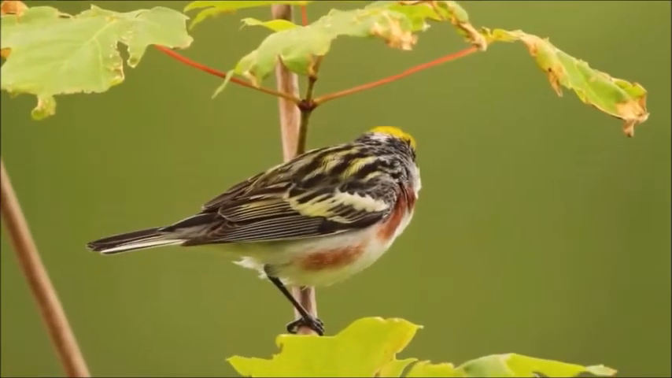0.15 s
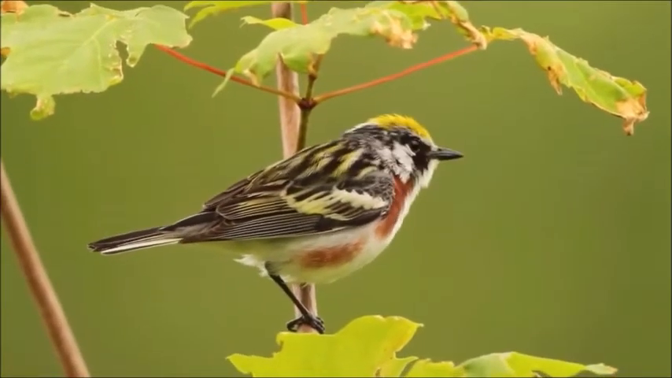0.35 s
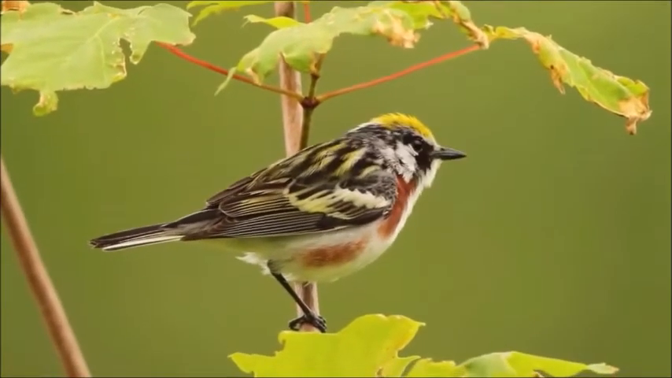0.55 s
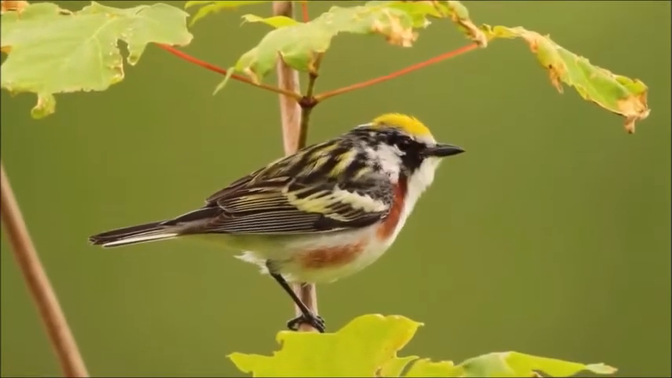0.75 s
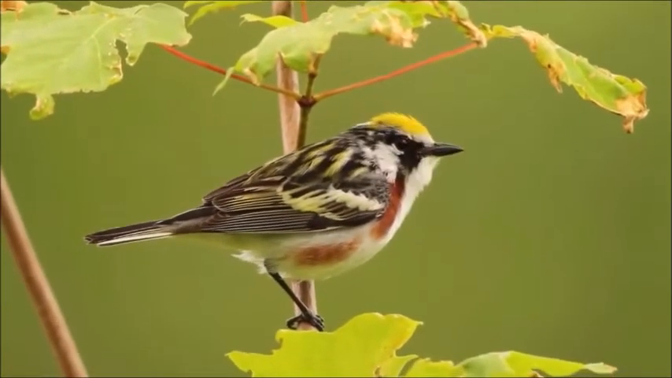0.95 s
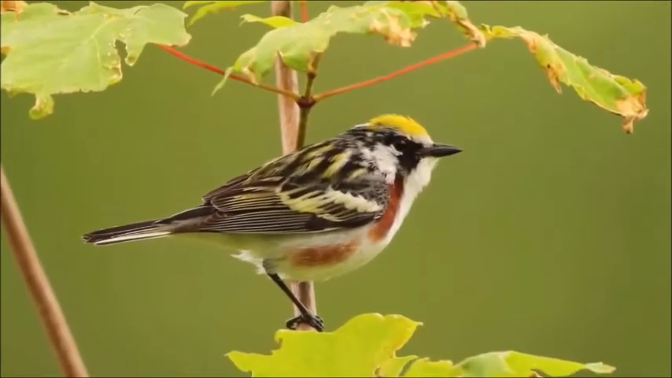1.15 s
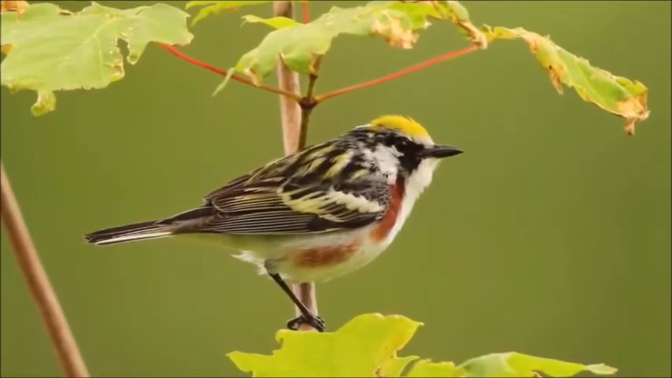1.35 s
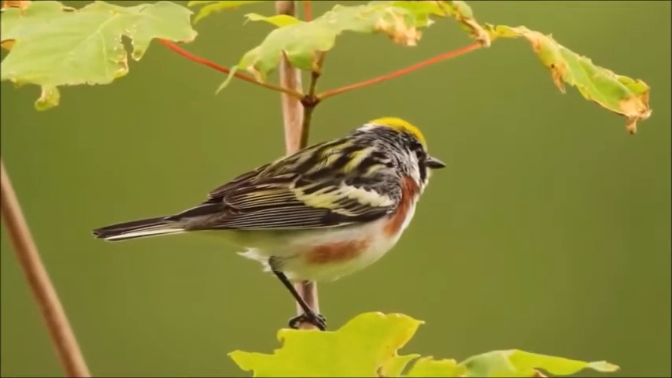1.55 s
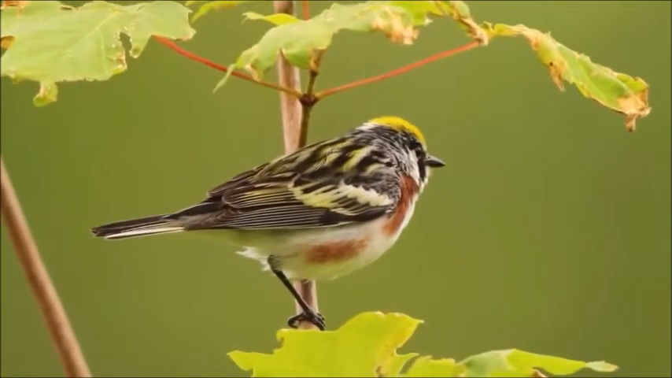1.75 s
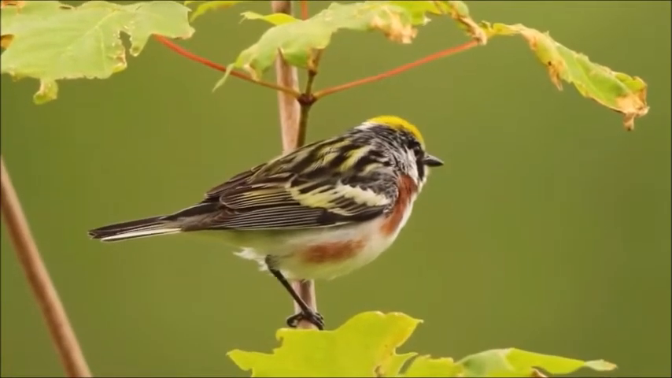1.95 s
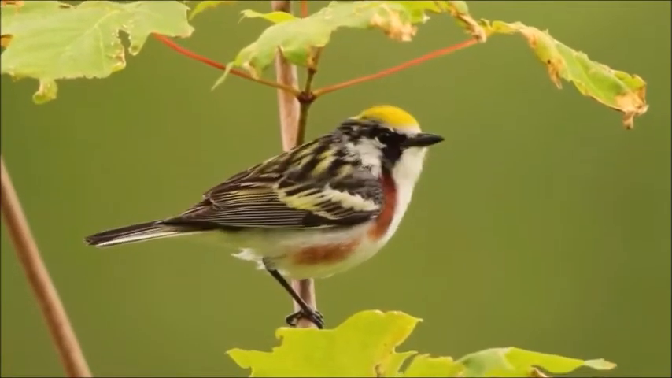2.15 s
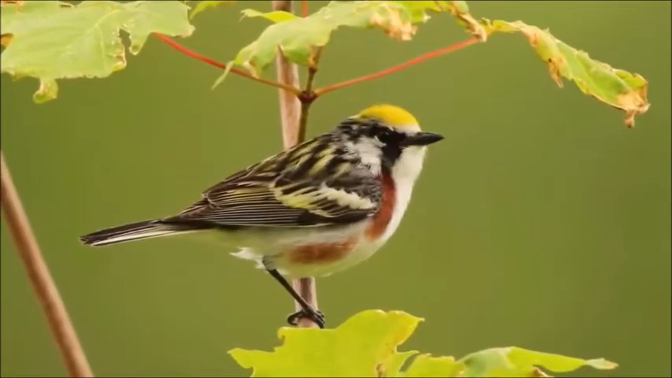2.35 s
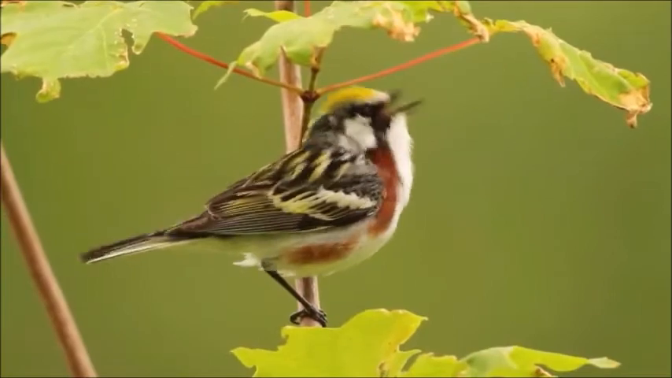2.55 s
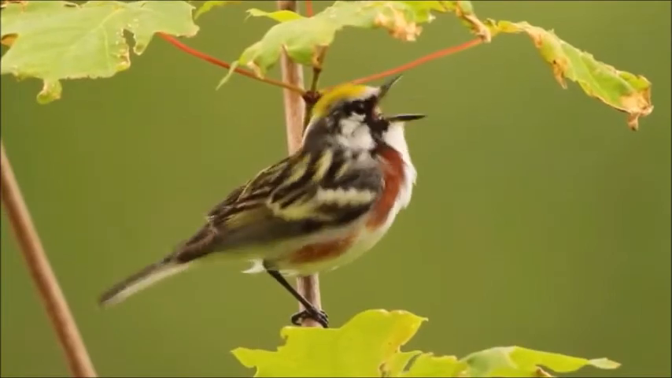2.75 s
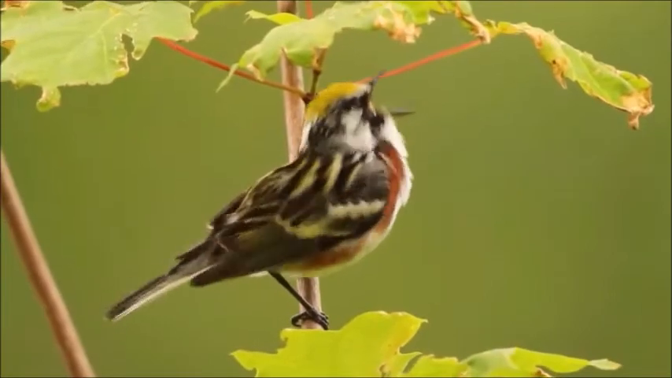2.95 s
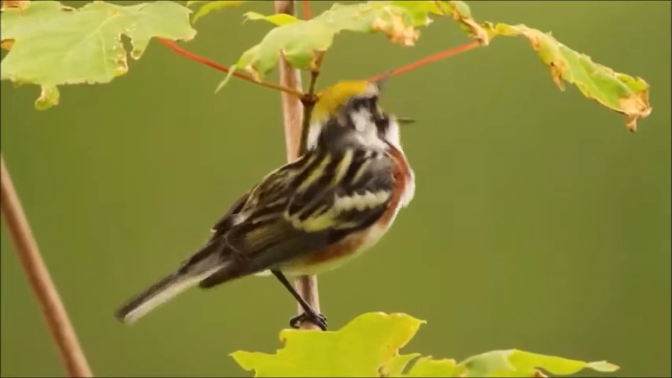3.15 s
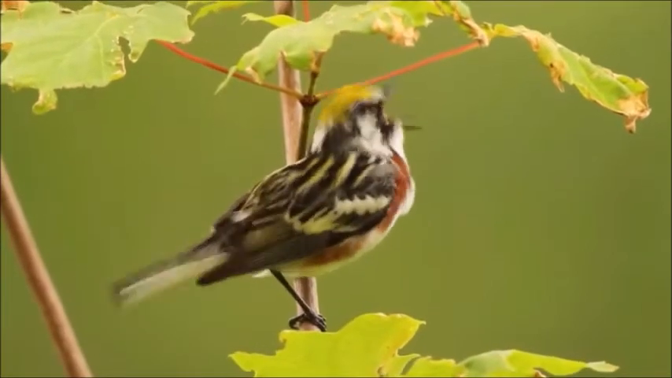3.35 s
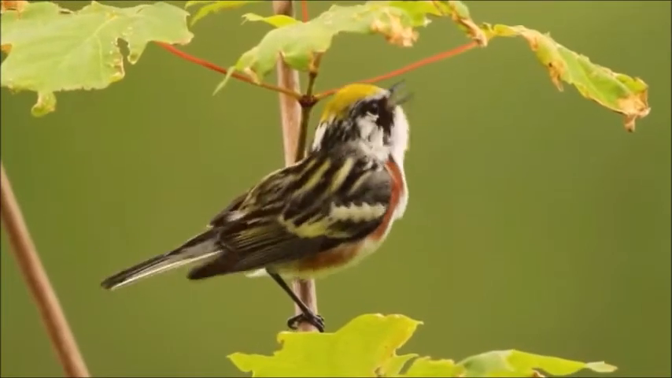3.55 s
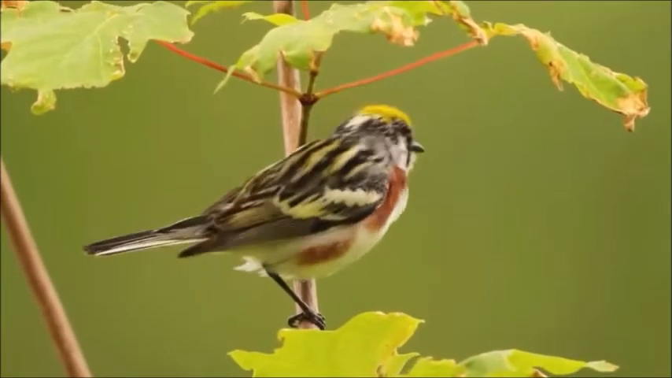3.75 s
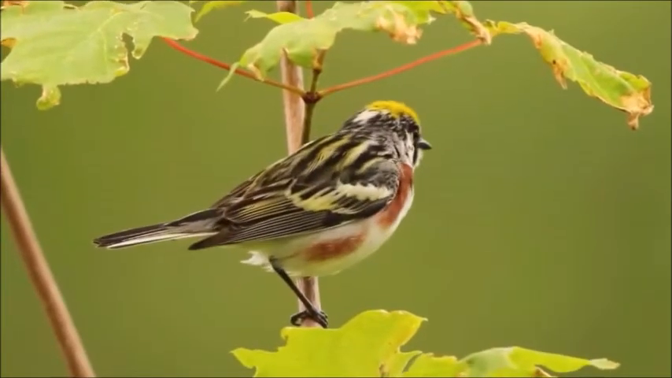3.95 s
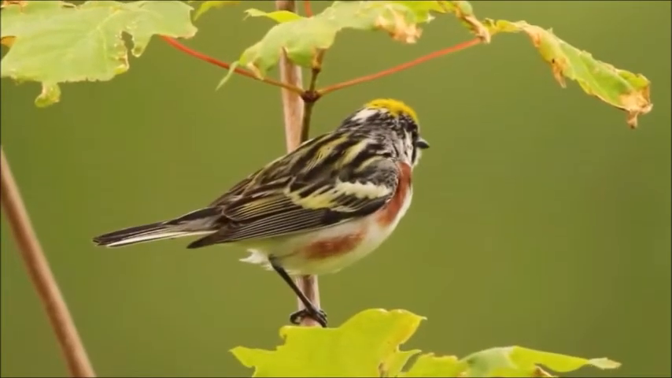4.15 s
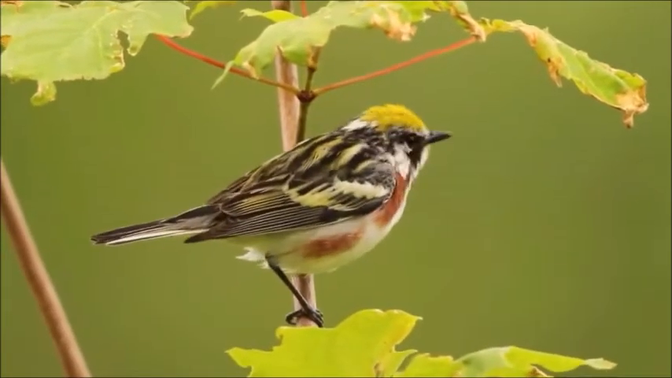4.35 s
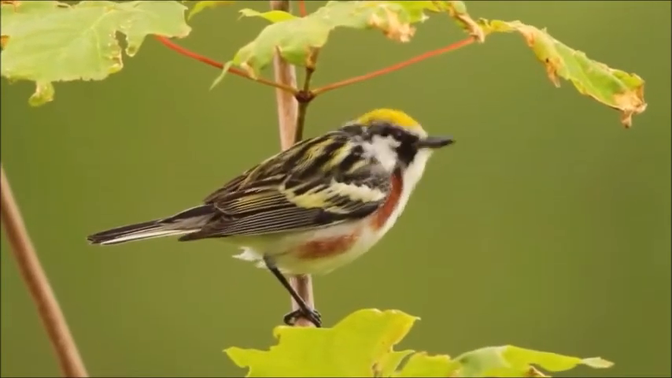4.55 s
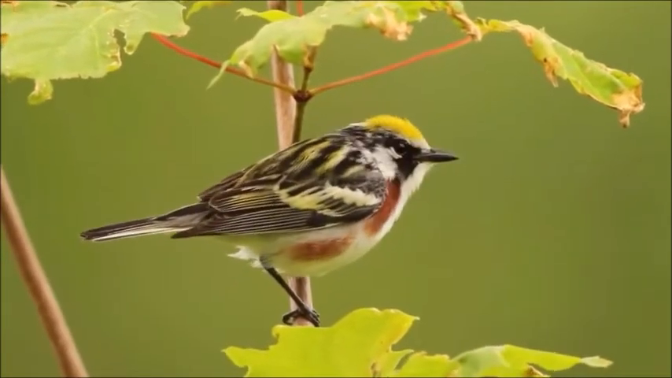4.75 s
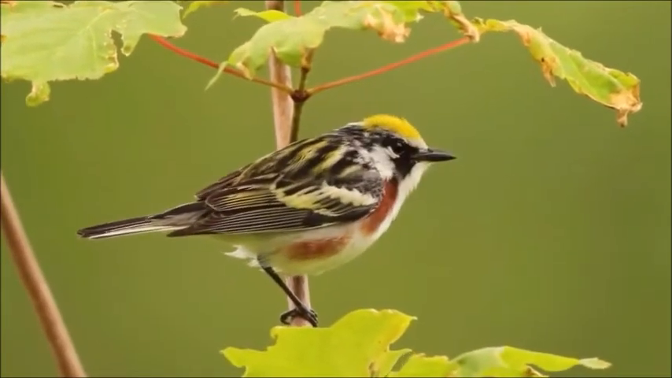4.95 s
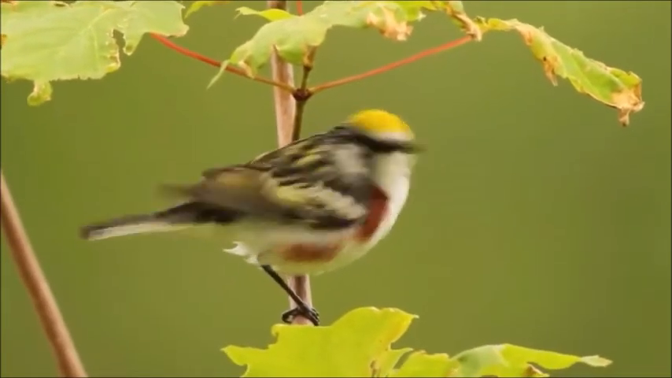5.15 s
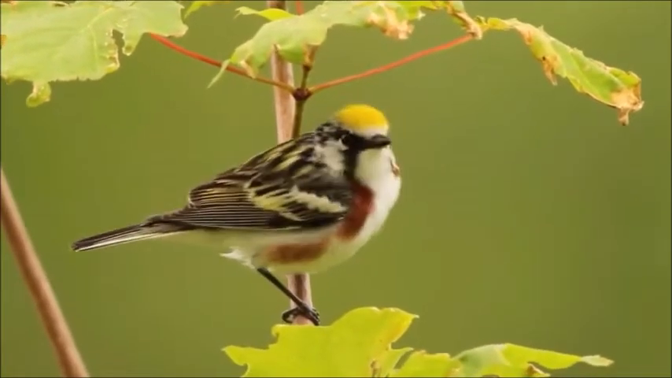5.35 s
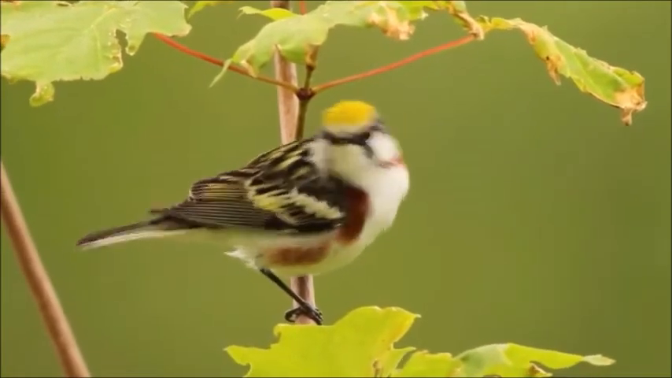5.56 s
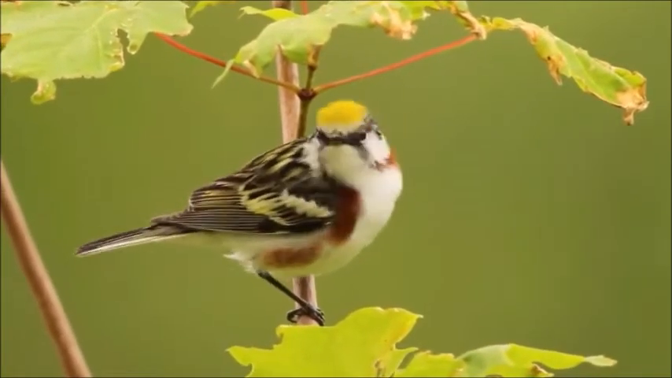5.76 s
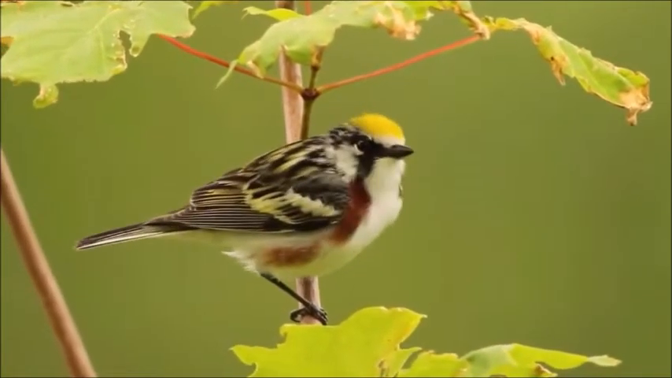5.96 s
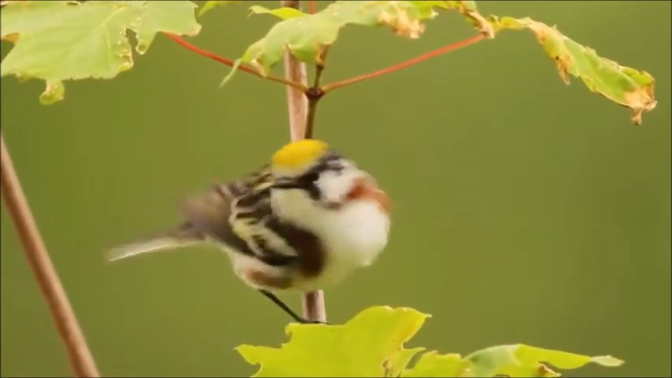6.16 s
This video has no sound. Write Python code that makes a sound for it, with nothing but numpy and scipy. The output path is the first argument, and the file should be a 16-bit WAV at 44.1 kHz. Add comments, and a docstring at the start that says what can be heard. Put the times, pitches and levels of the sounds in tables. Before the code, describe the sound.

Quiet woodland with low soft rumble and hiss, faint distant birds chirping and tiny dull pats like drops on leaves. Around two and a half seconds a small bird close to the microphone sings one fast, piercing phrase: four growing notes, two rising zigzags and a long falling slur. A light echo hangs in the trees, then only the faint background continues, with sparser far calls.

```python
"""A warbler close by sings one phrase: four arched notes growing louder, two rising zigzags, a long down-slur.
Its voice is one gliding sine with a weak octave, shadowed by faint high hiss; noise-tailed echoes are the wood.
Other birds call far off as short bent sines, and faint pats like drops on leaves are resonant noise bursts.
Below lie a low rumble with hiss, a thin distant trill and blurred birdsong of shaped noise, a sine drone,
and a faint low thump and a soft hum, also bent sines."""
import sys
import numpy as np
from scipy import signal
from scipy.fft import rfft, irfft
from scipy.io import wavfile
from scipy.ndimage import uniform_filter1d

SR = 44100
rng = np.random.default_rng(int(sys.argv[2]) if len(sys.argv) > 2 else 0)


def log_audio(samples):
    """Write samples as a 16-bit WAV file to the path given in sys.argv[1]."""
    # one column per channel
    frames = np.atleast_2d(samples).T
    # limit to full scale, then quantise
    limited = np.clip(frames, -1, 1)
    pcm = np.round(limited * 32767).astype(np.int16)
    wavfile.write(sys.argv[1], SR, pcm)


N = 274302
T = np.arange(N) / SR  # time [s]


def undb(db):
    """Decibels to gain."""
    return 10 ** (np.asarray(db) / 20)


def curve(rows):
    """Rows (time, value) joined by straight lines."""
    return np.interp(T, *np.reshape(rows, (-1, 2)).T)


def walk(rate, size=N):
    """Smooth random wander of spread about 1, heading for `rate` new values a second."""
    k = max(2, int(SR / rate))
    held = np.repeat(rng.standard_normal(size // k + 2), k)
    return 1.28 * uniform_filter1d(uniform_filter1d(held, k), k)[:size]


def noise(colour, alike_hz):
    """Stereo noise of a given colour, mid rms 1; well below alike_hz both sides hear nearly the same."""
    f = np.arange(N // 2 + 1) * SR / N + 1e-3
    hz, db = np.transpose(colour)
    shape = undb(np.interp(np.log(f), np.log(hz), db))
    mid, side = rfft(rng.standard_normal((2, N))) * shape
    mid = irfft(mid, N)
    side = irfft(side * f / (f + alike_hz), N)
    return np.array([mid + side, mid - side]) / mid.std()


def scatter(x, t60, rise_s, dull_hz):
    """Diffuse stereo echo: a noise tail that builds up, then dies away, with softened treble."""
    t = T[:int(1.6 * SR)]
    envelope = undb(-60 * t / t60) * (1 - np.exp(-t / rise_s))
    tail = rng.standard_normal((2, len(t))) * envelope
    tail /= np.sqrt(np.sum(tail ** 2, axis=1, keepdims=True))  # unit energy on each side
    tail = signal.sosfilt(signal.butter(2, dull_hz, fs=SR, output="sos"), tail)
    return signal.fftconvolve(x[None], tail, axes=1)[:, :N]


# Colour of the wood's steady air: (frequency [Hz], relative density [dB per Hz])
AIR_COLOUR = [(12, -28.5), (22, 3.5), (40, 1.5), (70, 0.5), (100, -8.5), (135, -18.5), (240, -21.5),
              (519, -23.5), (788, -19), (985, -26), (1340, -21), (1820, -22), (3450, -22), (4550, -33),
              (7520, -43.5), (11400, -49), (15500, -43.5)]


def steady_air(level_db=-54, wander_db=0.91):
    """Low rumble and hiss: shaped noise whose level wanders gently."""
    return noise(AIR_COLOUR, alike_hz=260) * undb(level_db + wander_db * walk(7.7))


# Colour of the thin far trill: (frequency [Hz], relative level [dB])
TRILL_COLOUR = [(950, -25), (1220, -5.5), (1420, 1.5), (1550, -10.5), (1800, -37.5)]
# Swell of the trill, before its trim: (time [s], level [dB])
TRILL_SWELL = [(0, -63), (.3, -62.5), (.76, -70), (2.2, -67), (2.45, -59.5), (3.59, -62.5), (4.2, -85.5),
               (4.44, -61.5), (5.13, -58.5), (6.2, -59.5)]


def far_trill(trim_db=-2, flicker_db=2.9):
    """A thin far trill: a narrow band of noise that swells and flickers."""
    level = curve(TRILL_SWELL) + trim_db + flicker_db * walk(23)
    return noise(TRILL_COLOUR, alike_hz=150.6) * undb(level)


# Colour of the blurred far birdsong: (frequency [Hz], relative level [dB])
BLUR_COLOUR = [(1700, -35), (2400, -7), (3300, -1), (4300, 0.5), (5500, -6), (7000, -21.5), (8500, -32.5)]
# Swell of the blurred chorus, before its trim: (time [s], level [dB])
BLUR_SWELL = [(0, -58), (.5, -63.5), (.8, -62.5), (1.3, -55), (2.1, -54.5), (2.6, -57), (3.8, -54.5),
              (4.5, -59), (5, -64.5), (5.5, -60), (6.2, -58.5)]


def blurred_chorus(trim_db=-1, flicker_db=2.9):
    """Far birdsong melted together: a broad treble band of noise that swells and flickers."""
    level = curve(BLUR_SWELL) + trim_db + flicker_db * walk(18)
    return noise(BLUR_COLOUR, alike_hz=299.6) * undb(level)


# Faint far-off drone, each tone wandering about: (frequency [Hz], rms level [dB])
DRONE_TONES = [(157, -72.5), (375, -81.5)]


def far_drone(waver=0.012, wander_db=2):
    """Low sines drifting a little in pitch and level."""
    drone = np.zeros(N)
    for hz, db in DRONE_TONES:
        level = undb(db + wander_db * walk(4.8)) * np.sqrt(2)  # rms to peak
        pitch = hz * (1 + waver * walk(5.7))
        drone += level * np.sin(2 * np.pi * np.cumsum(pitch) / SR)
    return drone


def background():
    """The bed: steady air, far trill, blurred chorus and drone."""
    return steady_air() + far_trill() + blurred_chorus() + far_drone()


def whistles(calls, waver=0.0079):
    """Short sines, each bending through three pitches on a parabola."""
    out = np.zeros(N)
    for start, length, first, middle, last, db in calls:
        span = np.arange(max(0, int(start * SR)), min(N, int((start + length) * SR)))
        u = np.linspace(0, 1, len(span))
        bend = np.polyfit([0, .5, 1], [first, middle, last], 2)
        pitch = np.polyval(bend, u) * (1 + waver * walk(250, len(span)))
        swell = np.sqrt(np.abs(np.sin(np.pi * u)))
        out[span] += undb(db) * swell * np.sin(2 * np.pi * np.cumsum(pitch) / SR)
    return out


def twitter(count=70, low_hz=2300, high_hz=4700, bend=.25, top_db=-54, spread_db=7, follow=.25):
    """Chance chirps of the farthest birds as whistle rows; low ones are flatter and longer."""
    when, height, slope, arch, weak = rng.random((count, 5)).T
    start = when * (T[-1] - .1)
    length = .09 - .05 * height
    hz = low_hz * (high_hz / low_hz) ** height
    glide = bend * (2 * slope - 1) * (.2 + height)
    middle = hz * (1 + bend * height * (arch - .5))
    # the chirps partly follow the swell of the chorus
    chorus = curve(BLUR_SWELL)
    db = top_db - spread_db * weak + follow * np.interp(start, T, chorus - chorus.mean())
    return np.transpose([start, length, hz * (1 - glide), middle, hz * (1 + glide), db])


# Clearest slurs of distant birds, levels before the direct and echo trims:
# (time [s], length [s], start pitch [Hz], middle pitch [Hz], end pitch [Hz], level [dB])
FAR_CALLS = [ (0, 0.037, 3544, 3950, 4650, -43.5), (.08, 0.068, 3400, 4290, 4390, -45.5),
             (.185, 0.075, 7200, 6120, 5040, -53), (.245, 0.064, 4900, 3844, 2940, -42.5),
             (.335, 0.044, 3300, 3310, 3800, -44.5), (.385, 0.041, 5220, 3910, 3050, -43),
             (.59, 0.0636, 2550, 2175, 2250, -54.5), (.67, 0.062, 1800, 2073, 2130, -48.5),
             (.775, 0.086, 2455, 2800, 2810, -46), (.86, 0.043, 2786, 2460, 2360, -47.5),
             (1.065, 0.048, 4030, 3410, 3070, -48.5), (1.14, .07, 3070, 3870, 4650, -49.5),
             (1.245, 0.052, 5100, 3990, 3040, -47.5), (1.315, 0.05, 3170, 3430, 3000, -46),
             (1.32, 0.14, 1870, 1950, 2110, -53.5), (1.385, .06, 5600, 4170, 3130, -46.5),
             (1.495, 0.059, 2960, 3975, 3140, -43.5), (1.64, .07, 2450, 2840, 3060, -49),
             (1.705, .055, 3007, 3680, 3800, -41), (1.815, 0.032, 2210, 2116, 2120, -45),
             (1.815, .11, 6960, 5360, 3990, -45), (1.9, 0.092, 2220, 2216, 2280, -52),
             (1.92, .035, 5180, 3900, 3100, -48), (1.98, 0.045, 2890, 3900, 4807, -43),
             (2.01, 0.069, 2520, 2513, 2540, -47), (2.035, 0.073, 6520, 5000, 3842, -46.5),
             (2.19, 0.053, 3740, 4520, 5830, -48), (2.285, .05, 3560, 3310, 3530, -49),
             (2.35, 0.062, 3630, 4750, 6140, -47.5), (2.475, 0.054, 5800, 4460, 3660, -46.5),
             (4.3, 0.031, 3700, 3165, 2800, -48), (4.66, 0.18, 4520, 4497, 4480, -53.5),
             (4.76, .06, 2955, 3204, 3700, -52), (5.09, .08, 2455, 2160, 2000, -54),
             (5.09, 0.27, 3240, 2622, 2380, -44.5), (5.375, 0.063, 3950, 3890, 3910, -51.5),
             (5.445, .035, 3910, 3310, 2900, -48.5), (5.64, 0.039, 3000, 3306, 3050, -53.5),
             (5.96, 0.072, 2743, 3110, 3300, -52), (6.06, .12, 2140, 1970, 1950, -57)]
# A faint low thump and a soft hum, levels before the same trims:
# (time [s], length [s], start pitch [Hz], middle pitch [Hz], end pitch [Hz], level [dB])
LOW_SOUNDS = [(.66, 0.077, 191, 179.5, 167, -55.5), (3.93, 0.383, 624, 597, 587, -64)]


def far_sounds(direct_db=-2.5, blur_db=-6, echo_db=-3):
    """Distant calls and low sounds in the centre, chirps on either side, blurred by the trees between."""
    calls = whistles(FAR_CALLS) + whistles(LOW_SOUNDS)
    chirps = np.array([whistles(twitter()) for side in range(2)])
    both = calls + chirps.mean(axis=0)
    blur = scatter(both, t60=0.13, rise_s=0.0013, dull_hz=7500)
    echo = scatter(both, t60=1.0, rise_s=0.017, dull_hz=6580)
    return undb(direct_db) * calls + chirps + undb(blur_db) * blur + undb(echo_db) * echo


def patter(count=80, top_db=-50.5, spread_db=7, low_hz=630, high_hz=1100):
    """A loose, steady drip of softer pats, one at random in each time slot, rather more of them low."""
    when, weak, height = rng.random((count, 3)).T
    start = (np.arange(count) + when) / count * T[-1]
    hz = low_hz * (high_hz / low_hz) ** height ** 1.19
    return np.transpose([start, top_db - spread_db * weak, hz])


# Clearest pats on the leaves, levels before the trim: (time [s], peak level [dB], pitch [Hz])
CLEAR_PATS = [(.082, -46, 670), (.41, -47, 766), (.571, -46.5, 816), (.779, -50, 740), (1.421, -45, 970),
              (1.487, -46, 880), (1.925, -46.5, 810), (2.198, -46, 740), (2.391, -47, 730),
              (2.753, -51, 845), (2.972, -48.5, 1132), (4.001, -48.5, 1274), (4.085, -50, 920),
              (4.405, -48, 880), (4.79, -48.5, 780), (4.922, -46, 1039), (5.124, -45, 1235),
              (5.326, -49, 785)]


def pats(trim_db=1, decay_s=0.0063, rise_s=.002, width_hz=400, echo_db=-10, low_hz=560):
    """Each pat is a brief dull rustle: a noise burst in a damped leaf resonance, with no bass."""
    out, t = np.zeros(N + SR), T[:SR // 10]
    no_bass = signal.butter(4, low_hz, "high", fs=SR, output="sos")
    envelope = np.exp(-t / decay_s) * (1 - np.exp(-t / rise_s))
    for start, db, hz in [*CLEAR_PATS, *patter()]:
        burst = rng.standard_normal(len(t)) * envelope
        leaf = signal.iirpeak(hz, hz / width_hz, fs=SR)
        rung = signal.lfilter(*leaf, signal.lfilter(*leaf, burst))  # two passes, narrower than one
        pat = signal.sosfilt(no_bass, rung)
        i = max(0, int(start * SR))
        out[i:i + len(t)] += undb(db + trim_db) * pat / np.abs(pat).max()
    dry_pats = out[:N]
    return dry_pats + undb(echo_db) * scatter(dry_pats, t60=0.22, rise_s=0.0045, dull_hz=3000)


# Echoes from nearby leaves and twigs: (delay to the left [s], delay to the right [s], level [dB])
TWIGS = [(.0006, 0.0012, -22.5), (.0027, .0019, -23), (.0058, .0071, -12)]


def foliage(song, near_db=-22, leaves_db=-23, wood_db=-30, glint_db=6):
    """The direct song, a few close reflections, a spray from the leaves and the long answer of the wood."""
    close = np.zeros((2, N))
    for *lags, db in TWIGS:
        close += undb(db) * np.array([np.roll(song, int(lag * SR)) for lag in lags])
    # the raised bill beams the highest pitches up into the leaves, which throw them back
    glint_band = signal.butter(2, [7200, 10000], "band", fs=SR, output="sos")
    glint = signal.sosfiltfilt(glint_band, song)
    near = scatter(song + undb(glint_db) * glint, t60=0.2, rise_s=0.0055, dull_hz=12110)
    leaves = scatter(song, t60=0.41, rise_s=0.0036, dull_hz=10200)
    wood = scatter(song, t60=1.1, rise_s=0.02, dull_hz=6020)
    return song + close + undb(near_db) * near + undb(leaves_db) * leaves + undb(wood_db) * wood


def following_hiss(song, hiss_db=-54, low_hz=9500):
    """Faint high hiss that rises and falls with the song."""
    treble = signal.butter(2, low_hz, "high", fs=SR, output="sos")
    hiss = signal.sosfilt(treble, rng.standard_normal(N))
    return undb(hiss_db) * hiss * uniform_filter1d(np.abs(song), size=200)


# The three syllables at full voice, timed from their own zero point.
# Arch, a short lead-in, a flick upward where the voice thins, then a loud fall:
# (time [s], pitch [Hz], level [dB])
ARCH = [(-.036, 5820, -24), (-.024, 6080, -11), (-.017, 6050, -4.5), (-.010, 6430, -1.5), (-.005, 7100, -8),
        (0, 9290, -27), (.007, 7450, -8.5), (0.015, 6560, -1), (.029, 5720, -4), (.044, 5100, -1),
        (.056, 4683, -0.5), (.061, 4714, -5), (.066, 4756, -18)]
# Zigzag, a slow climb, a quick dip and a leap to the top: (time [s], pitch [Hz], level [dB])
ZIGZAG = [(-.084, 2890, -28), (-.070, 3230, -12), (-.053, 3586, -4), (-.027, 4270, 1), (-.013, 4914, -1),
          (-.005, 5530, -3), (.001, 5660, 0), (.007, 5020, 0), (.014, 3855, -4.5), (.0205, 3460, -10.5),
          (.027, 3940, -3.5), (.034, 4850, 0), (.040, 6040, -8.5), (.046, 6400, 1), (.055, 6860, 0),
          (0.066, 7477, -1.5), (.071, 7170, -26.5)]
# Down-slur, dropping steeply, then ever more slowly as it fades: (time [s], pitch [Hz], level [dB])
SLUR = [(-.005, 8840, -36.5), (0, 9000, -23), (.008, 7610, -6), (.021, 6375, 0.5), (.036, 5715, -3),
        (.051, 5080, 0), (.066, 4590, -1.5), (0.082, 4120, -0.5), (.121, 3385, -8.5), (.141, 3020, -16.5),
        (.154, 2820, -35)]
# The phrase: (time of the syllable's zero point [s], syllable, level [dB])
PHRASE = [(2.538, ARCH, -29.5), (2.682, ARCH, -17), (2.828, ARCH, -12), (2.977, ARCH, -10),
          (3.165, ZIGZAG, -11), (3.366, ZIGZAG, -11.5), (3.484, SLUR, -11)]
# Below full voice a syllable sweeps a narrower range about its middle pitch, and its high part thins;
# above full voice the reverse.
FULL_DB, MIDDLE_HZ, NARROWING_PER_DB = -11, 6300, 0.023
THIN_FROM_HZ, THINNING_PER_OCTAVE = 4750, 0.6  # thinning [dB per octave, per dB below full voice]


def warbler(waver=0.0056, flutter_db=1.06, octave_db=-47, bill_hz=9700, bill_width_hz=700, leak_db=-63):
    """One gliding whistle per syllable, with a slight tremor and a very weak octave."""
    out = np.zeros(N)
    for when, syllable, level_db in PHRASE:
        s, hz, db = np.transpose(sorted(syllable))
        held_back = FULL_DB - level_db
        s = when + s
        hz = MIDDLE_HZ * (hz / MIDDLE_HZ) ** (1 - NARROWING_PER_DB * held_back)
        db = level_db + db - THINNING_PER_OCTAVE * held_back * np.log2(hz / THIN_FROM_HZ)
        span = np.arange(int(s[0] * SR), int(s[-1] * SR))
        t = T[span]
        # the syrinx cannot turn instantly, so corners of the glide are rounded
        glide = uniform_filter1d(np.interp(t, s, hz), size=130)
        pitch = glide * (1 + waver * walk(700, len(span)))
        loud = undb(np.interp(t, s, db) + flutter_db * walk(430, len(span)))
        to_edge = np.minimum(t - s[0], s[-1] - t)
        fades = np.sin(np.pi / 2 * np.clip(to_edge / .002, 0, 1)) ** 2
        phase = 2 * np.pi * np.cumsum(pitch) / SR
        # the octave escapes mostly near a resonance of the bill
        resonance = 1 / (1 + ((2 * pitch - bill_hz) / bill_width_hz) ** 2)
        octave = undb(leak_db) + undb(octave_db) * resonance
        out[span] += loud * fades * (np.sin(phase) + octave * np.sin(2 * phase))
    return out


def scene():
    """The singer in front, the wood all round."""
    song = warbler()
    return background() + far_sounds() + pats() + foliage(song) + following_hiss(song)


def record(dry, top_hz=15800):
    """The recorder cuts the top with a steep elliptic low-pass."""
    top_cut = signal.ellip(10, .1, 70, top_hz, fs=SR, output="sos")
    return signal.sosfilt(top_cut, dry)


dry = scene()
out = record(dry)
log_audio(out)
```